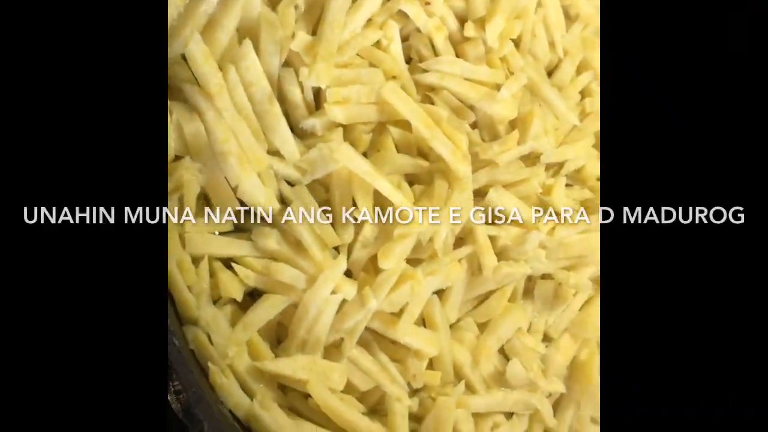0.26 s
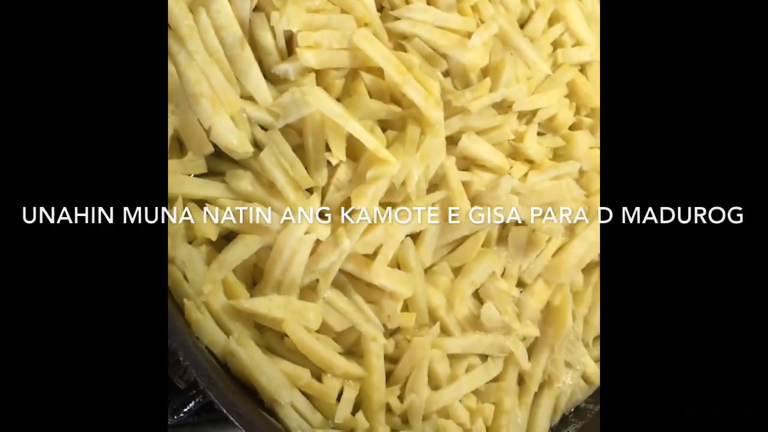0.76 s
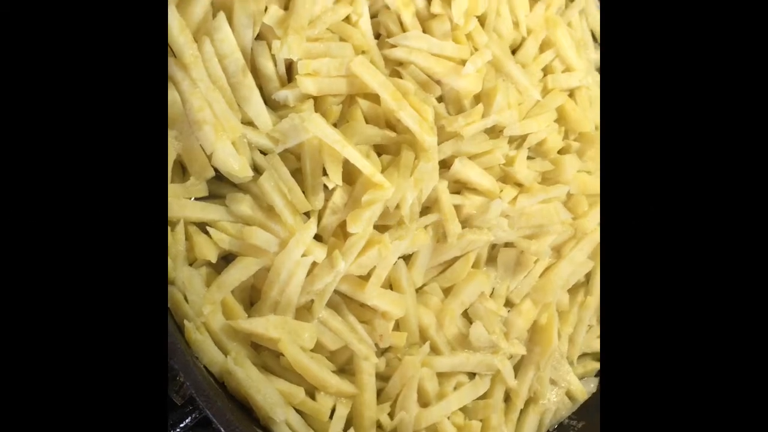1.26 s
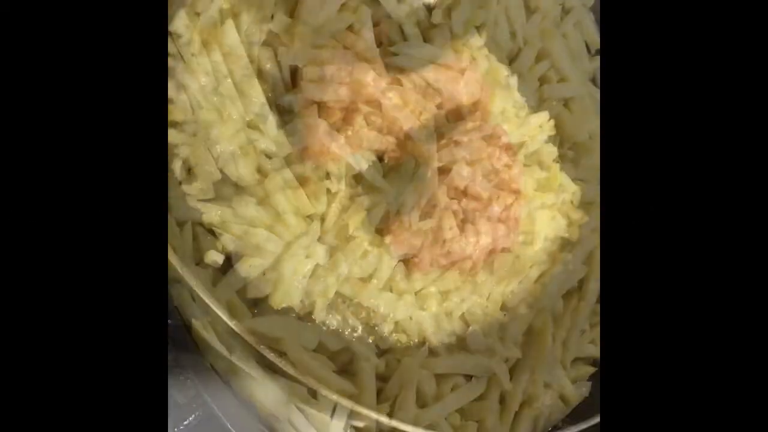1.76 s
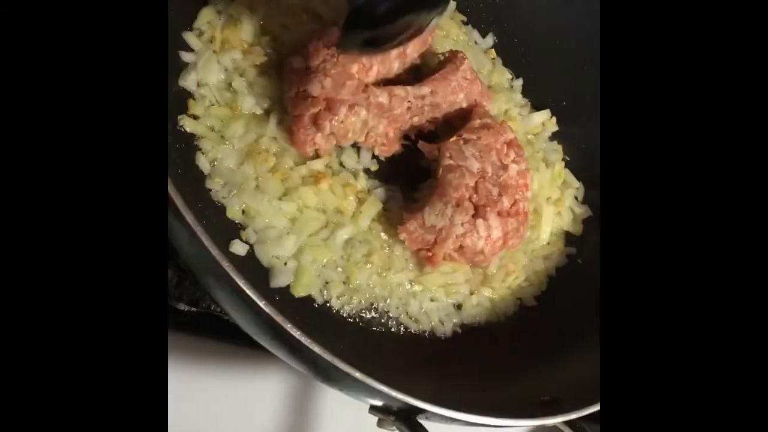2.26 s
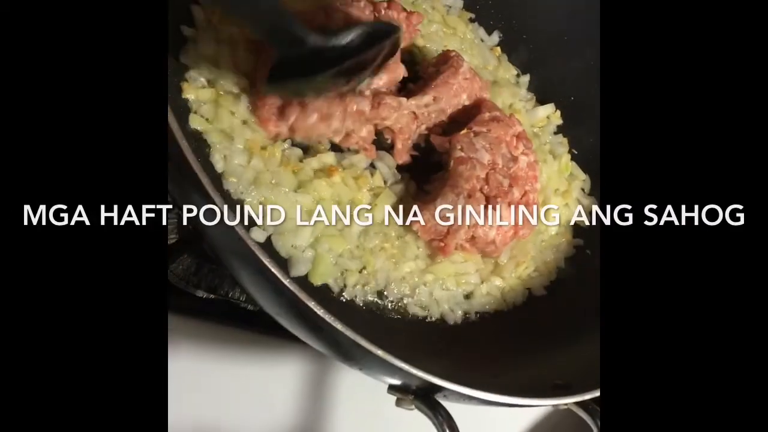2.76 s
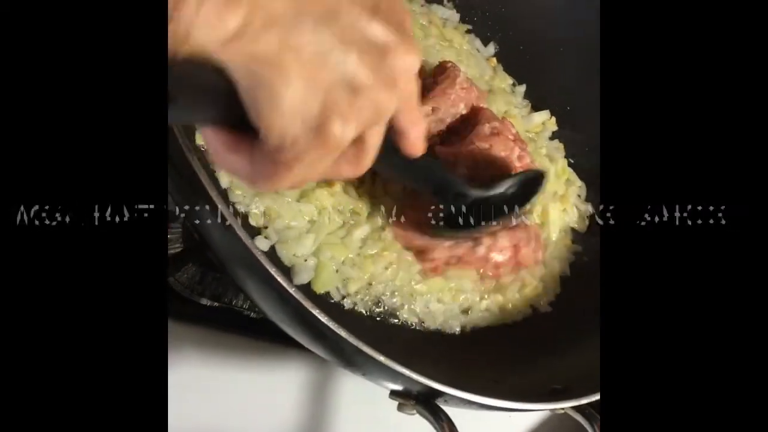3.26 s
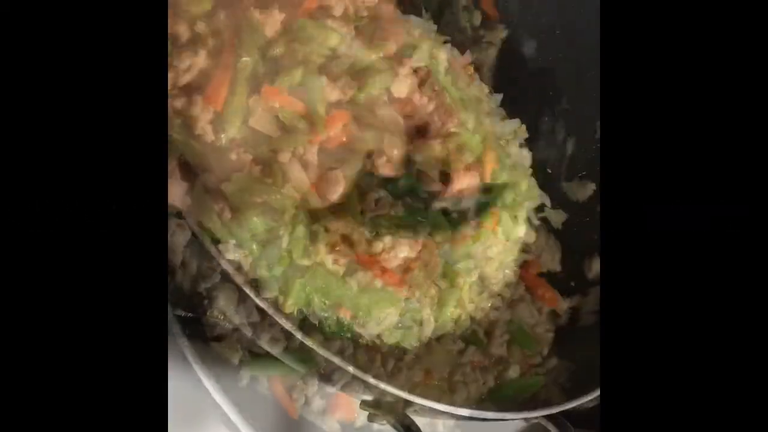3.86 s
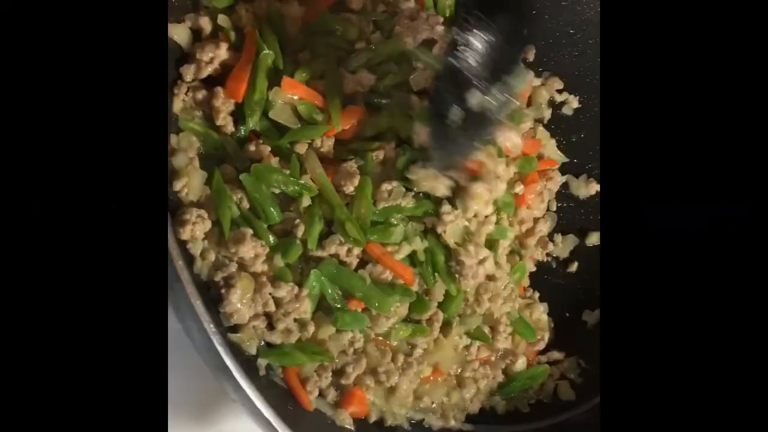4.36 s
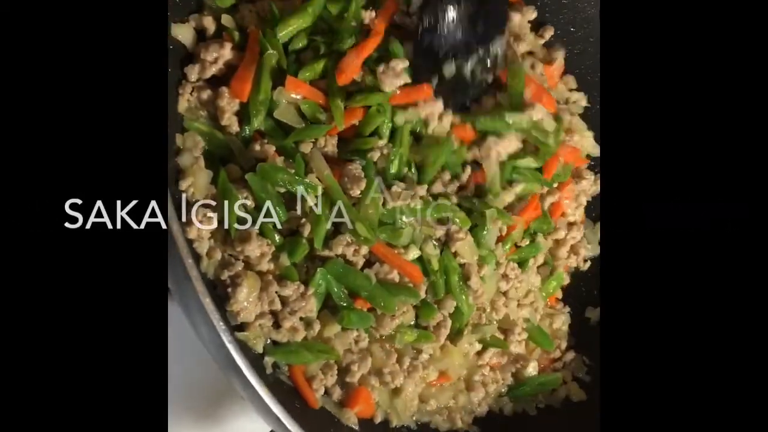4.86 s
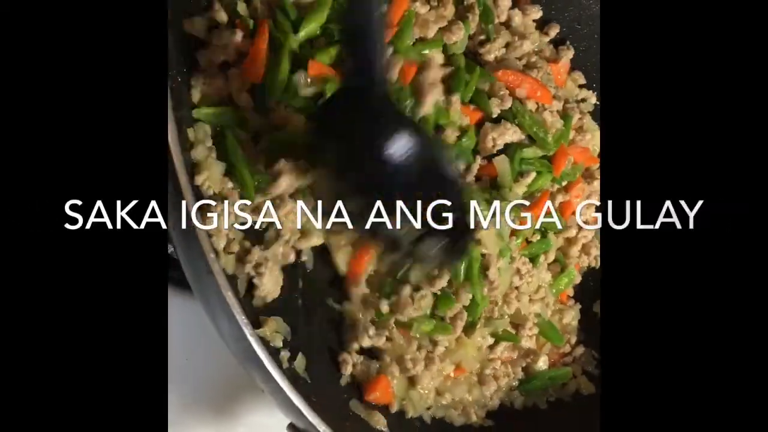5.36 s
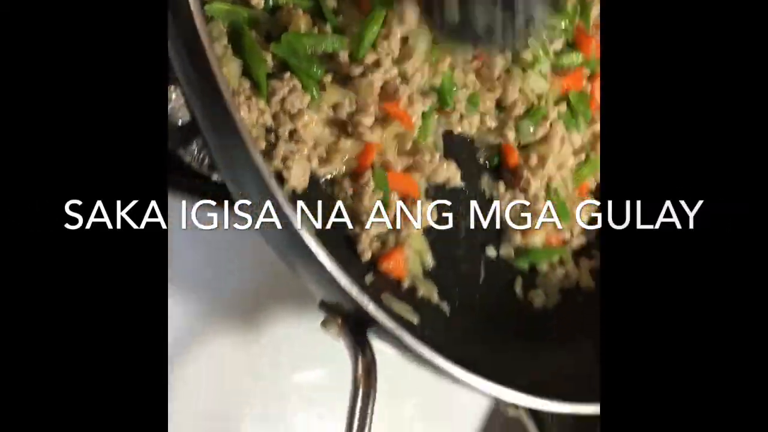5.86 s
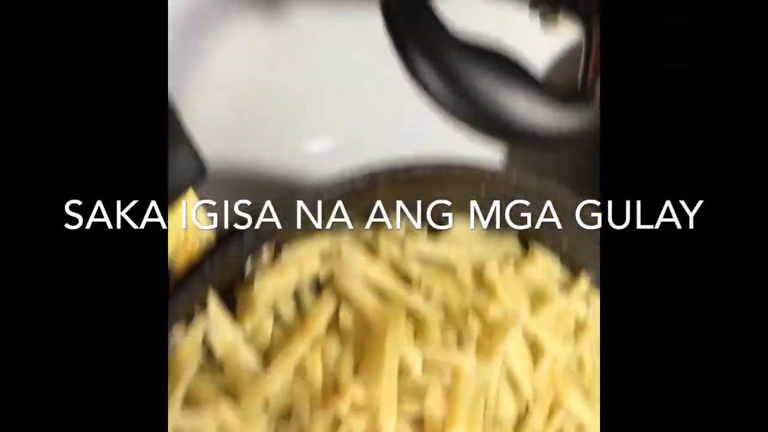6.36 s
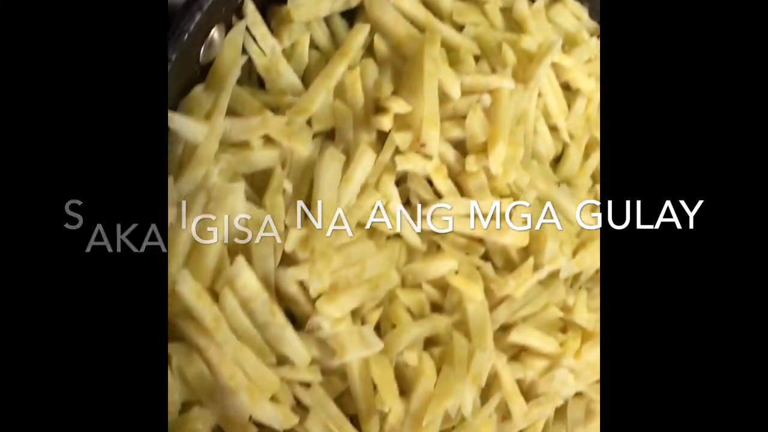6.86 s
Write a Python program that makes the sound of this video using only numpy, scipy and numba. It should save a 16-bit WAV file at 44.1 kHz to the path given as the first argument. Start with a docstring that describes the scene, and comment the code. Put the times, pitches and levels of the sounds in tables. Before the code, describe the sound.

Potato strips fry quietly under spoon taps, a wok jolts on its grate, then mince and vegetables sizzle strongly in a small kitchen.

```python
"""Frying in two pans.

Potato strips fry quietly while a plastic spoon knocks their pan; then onion, mince and vegetables sizzle in a wok.
Frying is thousands of tiny dying sines, the bubbles, over coloured noise; spitting fat is a resonant snap and splash.
Spoon knocks, and the wok sliding and jolting once on the grate, ring banks of modes mixed with decaying noise.
The stove top booms under the blows; a rumble and a low hum, both resonant or coloured noise, fill the small room."""
import sys
import numpy as np
from scipy import signal
from scipy.fft import rfft, irfft
from scipy.io import wavfile
from scipy.ndimage import uniform_filter1d
from numba import njit

SR = 44100
rng = np.random.default_rng(int(sys.argv[2]) if len(sys.argv) > 2 else 0)


def pcm_store(signal):
    """Save signal as 16-bit PCM."""
    levels = np.round(np.clip(np.atleast_2d(signal), -1, 1) * 32767)
    wavfile.write(sys.argv[1], SR, levels.astype(np.int16).T)


N = 313110
TIME = np.arange(N) / SR
RING = TIME[:SR]  # one second, the longest ring of a blow


def undb(db):
    """Decibels to gain."""
    return 10 ** (np.asarray(db) / 20)


def unit(x):
    """Scale to rms 1."""
    return x / np.sqrt(np.mean(x ** 2) + 1e-20)


def at_peak(x, db, window_s=0.004):
    """Scale a blow so that the rms of its loudest few milliseconds has this level."""
    power = uniform_filter1d(x ** 2, int(window_s * SR), mode="constant")
    return x * undb(db) / np.sqrt(power.max() + 1e-20)


def add(track, s, x):
    """Mix x into the track at time s."""
    i = max(int(s * SR), 0)
    track[i:i + len(x)] += x[:max(N - i, 0)]


def dying(t, t60):
    """Exponential decay by 60 dB in t60 seconds."""
    return np.exp(-np.log(1000) * t / t60)


def colour(x, points):
    """Give x a spectral weighting of (Hz, dB) points that falls steeply beyond its ends, at rms 1."""
    hz, db = np.transpose(points)
    log_hz = np.log(np.fft.rfftfreq(len(x), 1 / SR) + 1)
    beyond = np.abs(log_hz - np.clip(log_hz, np.log(hz[0]), np.log(hz[-1])))
    gain = undb(np.interp(log_hz, np.log(hz), db) - 60 * beyond)
    return unit(irfft(rfft(x) * gain, len(x)))


def resonate(x, hz, width_hz):
    """Two-pole resonance."""
    hz = min(hz, .4 * SR)
    b, a = signal.iirpeak(hz, hz / min(width_hz, SR / 4), fs=SR)
    return signal.lfilter(b, a, x)


def resonate_twice(x, hz, width_hz):
    """Two resonances in a row, the second twice as wide."""
    return resonate(resonate(x, hz, width_hz), hz, 2 * width_hz)


def walk(rate):
    """Smooth random wander with a spread of 1, taking a new value rate times a second."""
    hold = max(int(SR / rate), 2)
    steps = np.repeat(rng.standard_normal(N)[:N // hold + 1], hold)
    return unit(uniform_filter1d(steps, hold)[:N])


def tail(spectrum, t):
    """Noise in half-octave bands, each dying at its own rate; spectrum rows are (Hz, dB per Hz, t60)."""
    hz, db, t60 = np.transpose(spectrum)
    noise, out = rfft(rng.standard_normal(len(t))), 0
    octave = np.log2(np.fft.rfftfreq(len(t), 1 / SR) + 1)
    for centre in np.arange(5, 14.5, .5):
        band = irfft(noise * np.clip(1 - 2 * np.abs(octave - centre), 0, 1), len(t))
        band_db = np.interp(centre, np.log2(hz), db)
        band_t60 = np.interp(centre, np.log2(hz), t60)
        out = out + band * undb(band_db) * dying(t, band_t60)
    return out


@njit
def grains(start, hz, life, size):
    """Each burst is a sine that dies within a few cycles; its energy does not depend on its life."""
    out = np.zeros(N)
    for k in range(len(start)):
        z = size[k] / np.sqrt(life[k]) + 0j
        turn = np.exp(2j * np.pi * hz[k] / SR - 1 / (life[k] * SR))
        for i in range(start[k], min(N, start[k] + int(6 * life[k] * SR) + 1)):
            out[i] += z.real
            z *= turn
    return out


def bursts(per_s, spread_db, life_s, lo_hz, hi_hz, cap_db):
    """Bursting bubbles: very many faint ones, a few strong."""
    when, pitch, life, size = rng.random((int(per_s * N / SR), 4)).T
    start = (when * N).astype(np.int64)
    hz = lo_hz + pitch * (hi_hz - lo_hz)
    lives = life_s * 4 ** (life - .5)  # half to twice the middle life
    size_db = np.minimum(-spread_db * np.log(1 - size), cap_db)
    return unit(grains(start, hz, lives, undb(size_db)))


# Quiet potatoes, then the hot wok. Each row: time in seconds, level in dB before each layer's trim.
FRYING_LEVEL = [(0, -55.5), (0.7, -56.5), (1.33, -56), (1.56, -49), (1.9, -45), (2.5, -41), (3.15, -43),
                (4.0, -42), (4.7, -39.5), (5.8, -40.5), (7.1, -44.5)]
# The spoon turns food onto hot metal and the frying surges; the wet and spray layers rise by a share of it.
# Each row: start in seconds, length in seconds, full rise in dB.
STIR_SURGES = [(3.27, 0.46, 3), (4.51, 0.2, 3), (4.743, 0.26, 2.5), (5.408, 0.16, 4), (5.766, 0.35, 4),
               (6.498, 0.22, 2.4)]
STIR_RAMP_S = 0.083
# Colour of the small bubbles and hiss. Each row: frequency in Hz, relative level in dB.
SIZZLE_COLOUR = [(1290, -45), (2200, 2.5), (2740, -1.5), (3170, 3), (3700, 4.5), (4930, 0.5), (5500, 2.5),
                 (6730, 2.5), (7560, -1.5), (9010, 0.5), (10400, -4.5), (13500, -44), (22000, -120)]
# Colour of the big wet bubbles. Each row: frequency in Hz, relative level in dB.
WET_COLOUR = [(220, -48), (380, -10), (476, -9.5), (546, 1), (601, -4.5), (657, 0), (771, -3.5), (982, 0.5),
              (1590, -1), (2230, -1), (2600, -6), (3380, -11), (5720, -120)]
# Colour of the fine spray. Each row: frequency in Hz, relative level in dB.
SPRAY_COLOUR = [(9800, -78), (10500, -4), (11200, 11.5), (13500, 11.5), (16000, 11)]
# The spray beams upwards, so it fades once the microphone turns away from the wok.
TURN_AWAY_S, SPRAY_FADE_DB_PER_S = 5.96, 4.5
# Gentle frying crackles less: level of full crackle, and dB of crackle lost per dB below it.
HOT_DB, CRACKLE_SLOPE = -48.5, 0.58


def frying(hiss_db=-2, flicker_db=1.43, sizzle_db=1, wet_db=-2.5, spray_db=-5, wet_surge=0.99, spray_surge=0.66):
    """Small bubbles crackle over hiss; bigger, wetter ones sound where food is pressed to the metal."""
    level = np.interp(TIME, *np.transpose(FRYING_LEVEL))
    surge = np.zeros(N)
    for s, length, rise_db in STIR_SURGES:
        to_edge = np.minimum(TIME - s, s + length - TIME)
        surge += rise_db * np.clip(to_edge / STIR_RAMP_S, 0, 1)
    turned_away = np.maximum(TIME - TURN_AWAY_S, 0)
    sizzle = level + surge + sizzle_db
    wet = level + wet_surge * surge + wet_db
    spray = level + spray_surge * surge + spray_db - SPRAY_FADE_DB_PER_S * turned_away

    crackle = bursts(per_s=4000, spread_db=4.4, life_s=.00009, lo_hz=6000, hi_hz=16000, cap_db=32)
    small = bursts(per_s=4000, spread_db=3.6, life_s=.0004, lo_hz=2000, hi_hz=14000, cap_db=24)
    large = bursts(per_s=1500, spread_db=3.2, life_s=.0009, lo_hz=400, hi_hz=3000, cap_db=19)
    heat = undb(CRACKLE_SLOPE * np.minimum(level - HOT_DB, 0))
    # the hiss stands for countless smaller bubbles
    oil = heat * (crackle + small) / 2 + undb(hiss_db) * rng.standard_normal(N)
    food = large + undb(9) * rng.standard_normal(N)
    return (colour(oil, SIZZLE_COLOUR) * undb(sizzle + flicker_db * walk(35))
            + colour(food, WET_COLOUR) * undb(wet + flicker_db * walk(17))
            + colour(oil, SPRAY_COLOUR) * undb(spray + flicker_db * walk(50)))


# Spitting fat. Each row: start in seconds, peak in dB before the trim, centre in Hz.
FAT_SPITS = [(0.5048, -37, 7210), (0.9787, -35, 8200), (1.58, -30.5, 3860), (1.9276, -26, 2490),
             (2.2513, -25, 2420), (2.307, -29, 9370), (2.363, -27, 3480), (2.5313, -12, 11300),
             (2.6154, -20.5, 6300), (3.022, -23.5, 6090), (3.4815, -19, 6070), (4.3704, -17.5, 8450),
             (4.6461, -19, 4500), (6.4387, -17.5, 2970)]
SPLASH_T60_S = 0.0068


def spits(trim_db=-5, splash_db=-7, width=1.0):
    """A water drop explodes in the fat: one sharp snap, then a short splash."""
    out = np.zeros(N)
    t = RING[:SR // 8]
    for s, peak_db, hz in FAT_SPITS:
        burst = undb(splash_db) * rng.standard_normal(len(t)) * dying(t, SPLASH_T60_S)
        burst[0] += 2  # the snap
        spit = resonate_twice(burst, hz, width * hz)
        add(out, s, at_peak(spit, peak_db + trim_db, window_s=0.002))
    return out


def knocks(blows, modes, crack, crack_db, spot_db, trim_db, scatter_db=2.5, detune=0.0093):
    """Blows ring the modes, the spot struck favours some; a soft contact is duller and builds up slower."""
    out = np.zeros(N)
    hz, mode_db, t60 = np.transpose(modes)[:, :, None]
    for s, peak_db, contact_hz, push_s, spot_hz in blows:
        # mode levels and pitches vary from blow to blow
        gain, pitch, phase = rng.standard_normal((3, len(modes), 1))
        tone = np.sin(2 * np.pi * (hz * (1 + detune * pitch) * RING + phase))
        ring = (undb(mode_db + scatter_db * gain) * dying(RING, t60) * tone).sum(0)
        clatter = at_peak(tail(crack, RING), crack_db)
        blow = (at_peak(ring, 0) + clatter) * (1 - np.exp(-2 * RING / push_s))
        blow = blow + undb(spot_db) * resonate(blow, spot_hz, 0.3 * spot_hz)
        b, a = signal.butter(2, min(contact_hz, SR / 3), fs=SR)
        add(out, s, at_peak(signal.lfilter(b, a, blow), peak_db + trim_db))
    return out


def spoon(rows, lag_cycles, push_cycles, tick_harder, tick_higher):
    """The spoon's edge ticks, then its weight lands; the softer the contact, the later and slower."""
    blows = []
    for s, peak_db, contact_hz, spot_hz, tick_db, _ in rows:
        edge_hz = tick_harder * contact_hz
        landing_s = s + lag_cycles / contact_hz
        blows.append((s, peak_db + tick_db, edge_hz, push_cycles / edge_hz, tick_higher * spot_hz))
        blows.append((landing_s, peak_db, contact_hz, push_cycles / contact_hz, spot_hz))
    return blows


# Spoon on the wok. Each row: start in seconds, peak in dB before the trim, contact cut-off in Hz,
# favoured frequency in Hz, edge tick in dB relative to the peak, stove boom peak in dB.
WOK_BLOWS = [(1.93, -32, 1790, 650, -4, -32), (2.61, -36.5, 1300, 537, -11, -47),
             (4.222, -37, 1700, 646, -1.5, -39.5), (4.571, -38, 3000, 1300, 4, -50),
             (4.9092, -19, 1930, 800, 0, -36), (6.1054, -13, 2370, 700, -2, -38),
             (6.562, -36.5, 1400, 1050, -12, -50), (6.8125, -23.5, 1520, 750, 5.5, -43)]
# Modes of the wok. Each row: frequency in Hz, relative level in dB, t60 in seconds.
WOK_MODES = [(568, -6, 0.036), (659.5, -7.5, 0.069), (682, 0, 0.019), (950, -6, 0.064), (1063, -8.5, 0.06),
             (1230, -11, 0.064), (1594, -15, 0.046), (1825, 1, 0.021), (1820, -40, 0.018),
             (2175, -8, 0.067), (3680, -3, 0.019), (4430, -11.5, 0.065)]
# Dense clatter of the wok. Each row: frequency in Hz, relative level in dB per Hz, t60 in seconds.
WOK_CLATTER = [(200, -27, 0.074), (400, -10, 0.067), (606, -1.5, 0.037), (1390, -3, 0.038),
               (2100, -1, 0.013), (3100, -11, 0.036), (6900, -1, 0.03), (15000, -18, 0.016)]


def wok_knocks():
    """The spoon knocks the wok as the food is turned."""
    blows = spoon(WOK_BLOWS, lag_cycles=2.39, push_cycles=1.7, tick_harder=2.03, tick_higher=2.37)
    return knocks(blows, WOK_MODES, WOK_CLATTER, crack_db=0, spot_db=5.0, trim_db=1)


# Spoon on the potato pan. Each row: start in seconds, peak in dB before the trim, contact cut-off in Hz,
# favoured frequency in Hz, edge tick in dB relative to the peak, stove boom peak in dB.
PAN_BLOWS = [(0.0, -38.5, 1235, 523, -8, -57), (0.2821, -22.5, 2020, 540, -2, -34),
             (0.3838, -23, 1365, 547, -7, -38), (0.6609, -12.5, 2400, 796, -7.5, -37),
             (1.051, -28.5, 965, 710, -25, -48), (1.3312, -36, 2800, 600, -2, -42),
             (1.403, -40, 2440, 597, -8, -47), (1.778, -24.5, 2600, 560, -1, -41)]
# Modes of the pan. Each row: frequency in Hz, relative level in dB, t60 in seconds.
PAN_MODES = [(561.5, 4.5, 0.1), (603, -7, 0.25), (785, 3, 0.037), (847, -21, 0.037), (983, -1, 0.052),
             (1180, -5, 0.063), (1413, 7.5, 0.015), (1835, 2.5, 0.018), (2083, -18, 0.11)]
# Dense clatter of the pan. Each row: frequency in Hz, relative level in dB per Hz, t60 in seconds.
PAN_CLATTER = [(200, -22, 0.053), (400, -3.5, 0.075), (600, -7, 0.13), (1300, -4.5, 0.074),
               (2820, -10, 0.047), (6540, -10, 0.064), (15000, -31, 0.086)]


def pan_knocks():
    """The spoon knocks the pan of potatoes."""
    blows = spoon(PAN_BLOWS, lag_cycles=6.5, push_cycles=1.0, tick_harder=3.7, tick_higher=1.85)
    return knocks(blows, PAN_MODES, PAN_CLATTER, crack_db=-5, spot_db=0.5, trim_db=-2.5)


# The wok drops on the grate and rocks to rest.
# Each row: start in seconds, peak in dB before the trim, favoured frequency in Hz.
WOK_JOLTS = [(2.0322, -8.5, 166), (2.038, -7, 162), (2.0493, -10.5, 1350), (2.0647, -9.5, 990),
             (2.119, -22, 159), (2.171, -28.5, 696)]
# Modes of the grate. Each row: frequency in Hz, relative level in dB, t60 in seconds.
GRATE_MODES = [(123, -4.5, 0.1), (166, -5, 0.13), (186.4, -0.5, 0.14), (220.4, -8.5, 0.15),
               (311, 2.5, 0.086), (337.6, -18, 0.66), (371.8, -10.5, 0.65), (540, -7, 0.43),
               (695, 4.5, 0.057), (1031, -9, 0.19), (1213, 0, 0.074), (1380, -15, 0.077), (1680, -9, 0.081),
               (1913, -5, 0.082)]
# Dense clatter of the grate. Each row: frequency in Hz, relative level in dB per Hz, t60 in seconds.
GRATE_CLATTER = [(50, -8, 0.25), (170, -1, 0.11), (428, -7.5, 0.13), (900, -1.5, 0.075), (1980, -5, 0.069),
                 (4240, -15.5, 0.095), (15000, -12.5, 0.041)]
LANDING_S = WOK_JOLTS[0][0]


def wok_jolt(landing_hz=9000, soften_s=0.024, push_s=0.002):
    """The wok lands on the grate, softer with every rebound: the contact cut-off halves after soften_s."""
    blows = []
    for s, peak_db, spot_hz in WOK_JOLTS:
        contact_hz = landing_hz / (1 + (s - LANDING_S) / soften_s)
        blows.append((s, peak_db, contact_hz, push_s, spot_hz))
    return knocks(blows, GRATE_MODES, GRATE_CLATTER, crack_db=5, spot_db=4, trim_db=-1.47)


def scrape(stroke, modes, crack, crack_db, contact_hz, swell_db, slips_per_s=600):
    """Sliding is a dense run of tiny soft blows that rises by swell_db until the motion stops."""
    s, length, peak_db, spot_hz = stroke
    soft_blow = (0.001, 0, contact_hz, 0.001, spot_hz)
    body = knocks([soft_blow], modes, crack, crack_db, spot_db=2, trim_db=0)[:SR]
    slips = rng.standard_normal(SR) * (rng.random(SR) < slips_per_s / SR) * (RING < length)
    slips = slips * undb(swell_db * np.minimum(RING / length, 1))
    out = np.zeros(N)
    add(out, s, at_peak(signal.fftconvolve(slips, body), peak_db))
    return out


# One slide that ends as the wok drops. The row: length in seconds, peak in dB, favoured frequency in Hz.
SLIDE = (0.095, -28, 184)


def wok_slide():
    """The wok slides on the grate up to the moment it drops, growing louder."""
    stroke = (LANDING_S - SLIDE[0], *SLIDE)
    return scrape(stroke, GRATE_MODES, GRATE_CLATTER, crack_db=11, contact_hz=1090, swell_db=6)


# Spoon in the potatoes. Each row: start in seconds, length in seconds, peak in dB, favoured frequency in Hz.
SPOON_DRAGS = [(0.695, 0.07, -36, 750), (1.411, 0.06, -45.5, 1650)]


def spoon_drag():
    """The spoon drags through the potatoes in even strokes."""
    return sum(scrape(stroke, PAN_MODES, PAN_CLATTER, crack_db=1, contact_hz=1700, swell_db=0)
               for stroke in SPOON_DRAGS)


def bumps(pushes, width=0.46):
    """Short booms of resonant noise; rows are (s, peak dB, Hz, seconds to fall by 40 dB)."""
    out = np.zeros(N)
    for s, peak_db, hz, length in pushes:
        push = rng.standard_normal(SR) * np.exp(-np.log(100) * RING / length)
        add(out, s, at_peak(resonate_twice(push, hz, width * hz), peak_db))
    return out


# The stove top shudders as the potatoes are pushed.
# Each row: start in seconds, peak in dB, frequency in Hz, length in seconds.
POTATO_SHUDDERS = [(0.816, -41, 71, 0.3), (0.904, -39, 71, 0.32)]


def stove(pan_hz=135, pan_s=0.21, wok_hz=92, wok_s=0.1, jolt_db=-22, jolt_hz=115, jolt_s=0.31):
    """Knocks and the jolt pass down into the stove top, which booms on its own note under each pan."""
    under_pan = [(s, boom_db, pan_hz, pan_s) for s, *_, boom_db in PAN_BLOWS]
    under_wok = [(s, boom_db, wok_hz, wok_s) for s, *_, boom_db in WOK_BLOWS]
    jolt = [(LANDING_S, jolt_db, jolt_hz, jolt_s)]
    return bumps(under_pan + under_wok + jolt + list(POTATO_SHUDDERS))


# Colour of the room rumble. Each row: frequency in Hz, relative level in dB.
RUMBLE_COLOUR = [(15, -44), (25, -9.5), (54, 6), (125, -9), (172, -3.5), (262, -7), (293, -1.5),
                 (323, -10.5), (352, -4.5), (480, -29), (620, -36), (1060, -120)]
# Hum bands. Each row: frequency in Hz, width of each resonance in Hz, level in dB before the nearness.
HUM_BANDS = [(295.5, 15.4, -53.5), (356, 16, -61)]
# Nearness of the hum. Each row: time in seconds, gain in dB.
HUM_NEARNESS = [(4.0, -5), (4.7, 0.5)]


def background(rumble_db=-51):
    """Low room rumble of coloured noise and a wavering hum of narrow noise bands, as of a fan."""
    rumble = colour(rng.standard_normal(N), RUMBLE_COLOUR) * undb(rumble_db + walk(6))
    hum = np.zeros(N)
    for hz, width_hz, db in HUM_BANDS:
        band = resonate(resonate(rng.standard_normal(N), hz, width_hz), hz, width_hz)
        hum += undb(db) * unit(band)
    return rumble + hum * undb(np.interp(TIME, *np.transpose(HUM_NEARNESS)))


def kitchen(x, wet_db, gap_s=0.002):
    """Near walls answer after a few milliseconds and die away, the bass last."""
    walls = [(100, -7, 0.99), (580, -6, 0.3), (2010, 2.5, 0.18), (12000, -6.5, 0.25)]  # Hz, dB per Hz, t60 s
    echo = tail(walls, RING) * (1 - np.exp(-(RING / gap_s) ** 2))
    echo = echo / np.sqrt(np.sum(echo ** 2))
    return x + undb(wet_db) * signal.fftconvolve(x, echo)[:N]


def scene():
    """Frying and blows in the kitchen, on one channel; the wok is nearer, so its knocks sound drier."""
    farther = pan_knocks() + wok_jolt() + spoon_drag() + wok_slide()
    mix = frying() + stove() + background()
    mix = mix + kitchen(farther, wet_db=-12.5)
    mix = mix + kitchen(wok_knocks(), wet_db=-15.5)
    mix = mix + kitchen(spits(), wet_db=-15)
    return mix[None]


def record(dry):
    """The microphone drops the deepest bass, rounds the loudest peaks and cuts the top."""
    ceiling, bass_hz, top_hz = 0.73, 36, 15900
    thinned = signal.sosfilt(signal.butter(3, bass_hz, "high", fs=SR, output="sos"), dry)
    rounded = ceiling * np.tanh(thinned / ceiling)
    return signal.sosfilt(signal.ellip(10, .2, 70, top_hz, fs=SR, output="sos"), rounded)


dry = scene()
out = record(dry)
pcm_store(out)
```